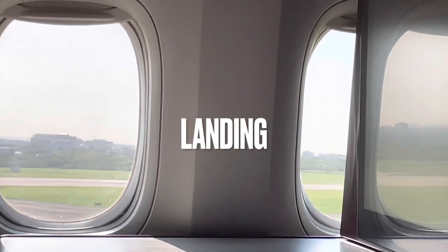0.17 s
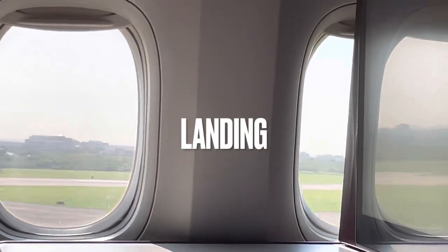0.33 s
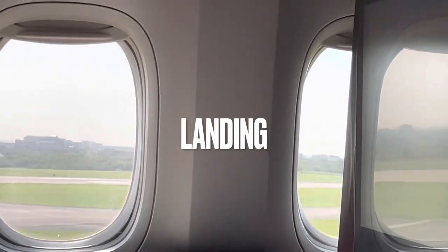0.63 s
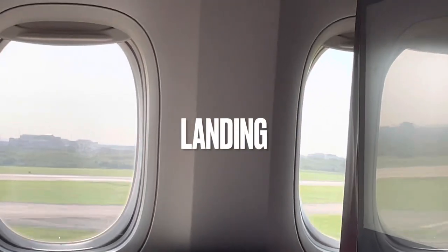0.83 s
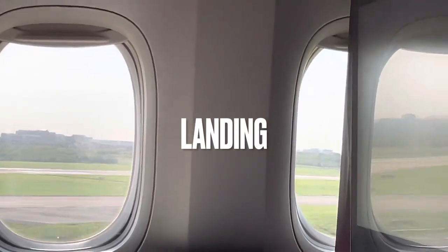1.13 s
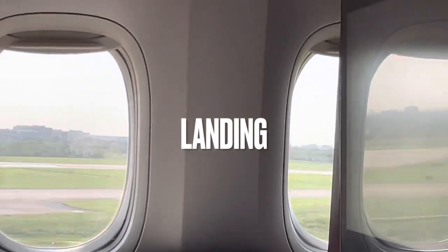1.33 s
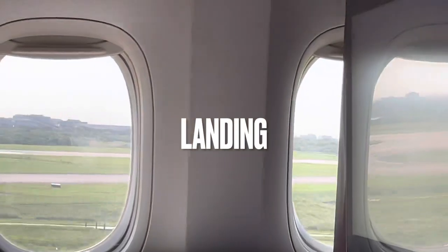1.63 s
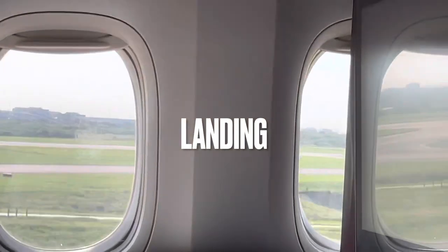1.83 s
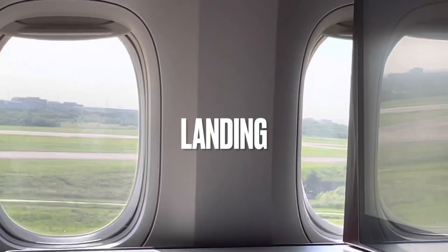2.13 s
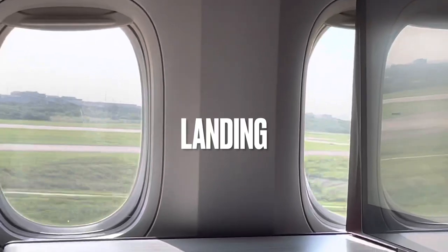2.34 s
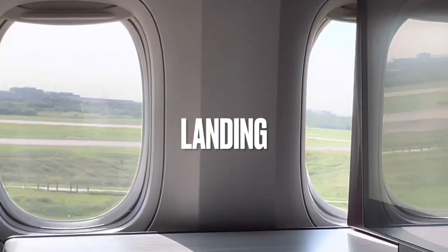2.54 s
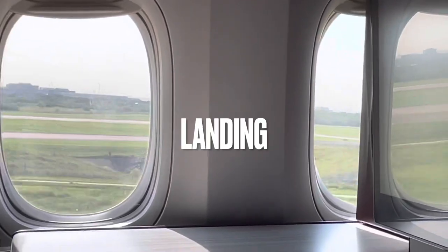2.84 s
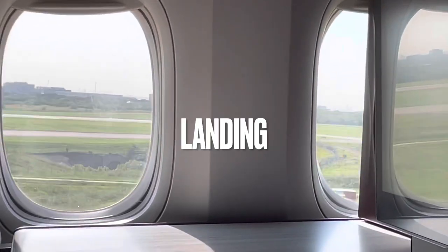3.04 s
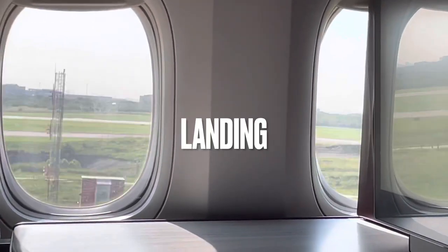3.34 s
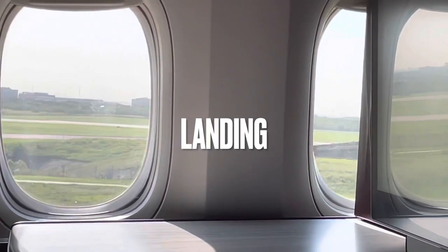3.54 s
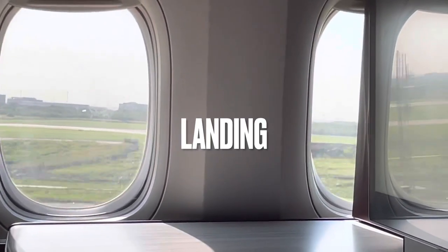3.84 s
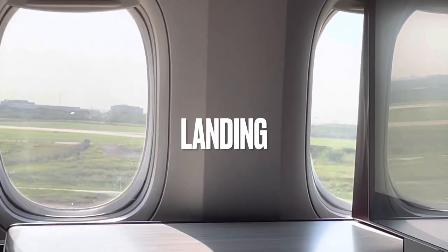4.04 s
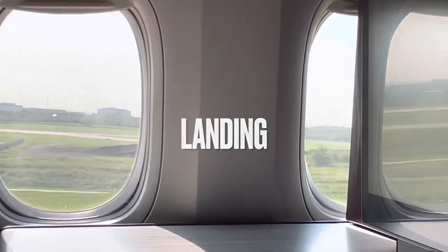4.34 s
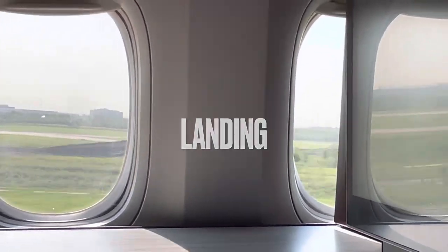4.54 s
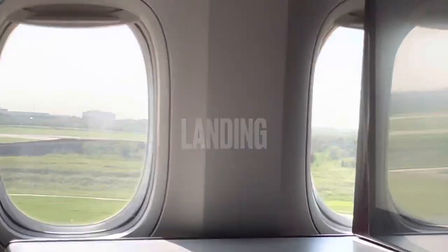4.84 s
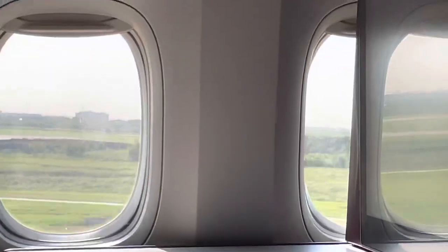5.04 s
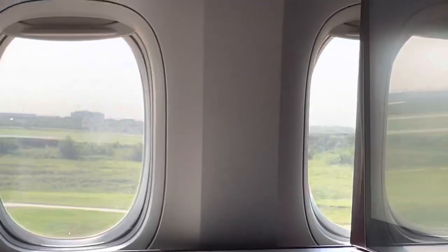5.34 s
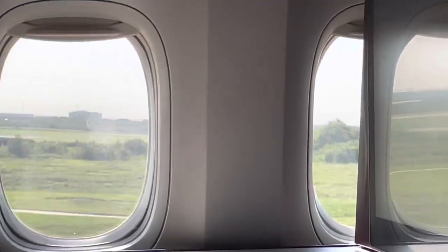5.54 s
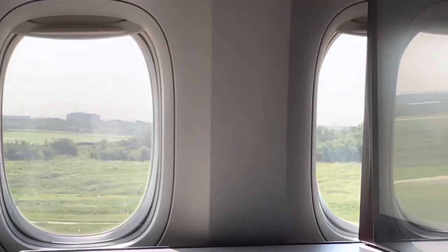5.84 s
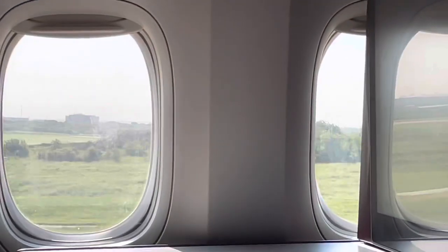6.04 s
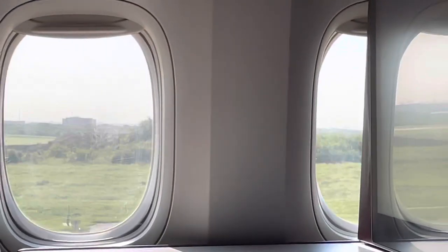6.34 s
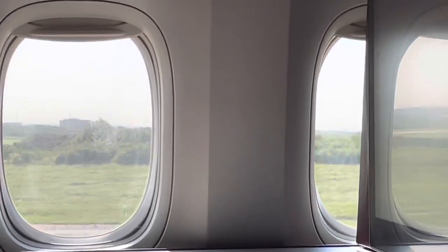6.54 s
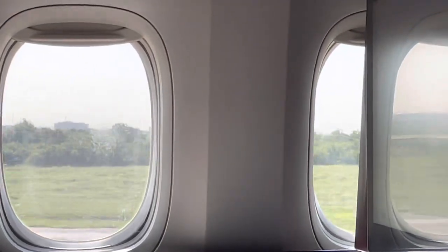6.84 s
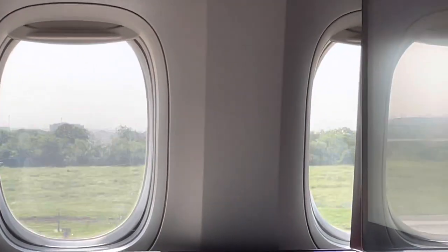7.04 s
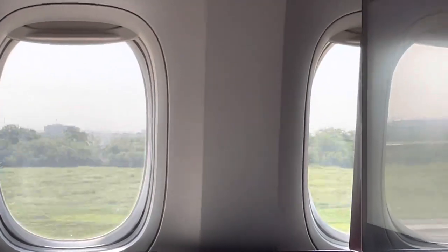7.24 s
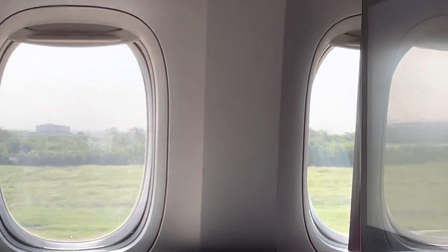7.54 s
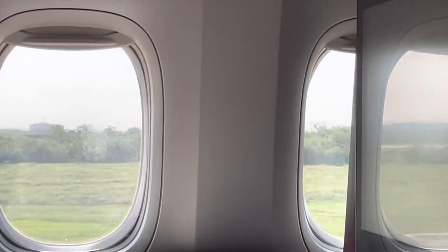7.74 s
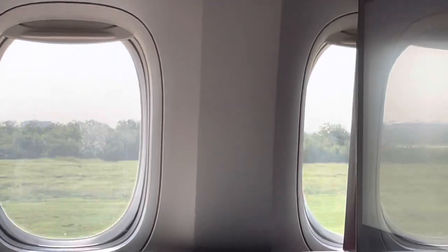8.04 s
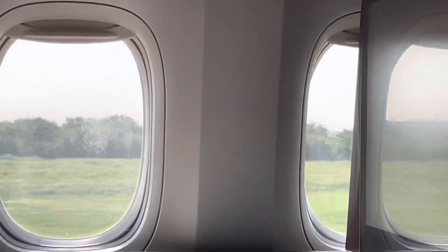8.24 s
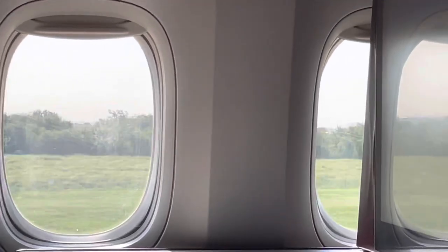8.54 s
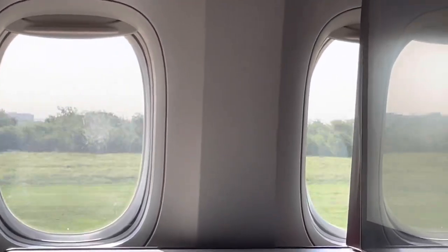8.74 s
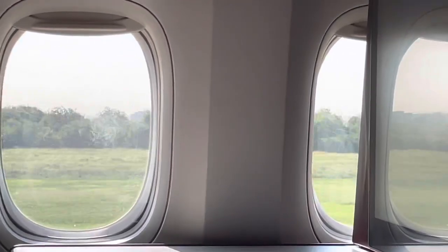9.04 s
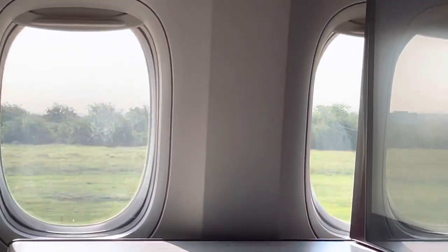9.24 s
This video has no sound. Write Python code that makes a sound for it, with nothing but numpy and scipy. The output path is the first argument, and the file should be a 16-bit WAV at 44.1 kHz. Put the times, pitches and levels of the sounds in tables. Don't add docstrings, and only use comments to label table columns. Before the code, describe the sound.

Inside an airliner cabin on landing, low rumble and vent hiss give way to a touchdown jolt, rattling panels, bangs and swelling reverse-thrust roar.

```python
import sys
import numpy as np
from scipy import signal
from scipy.fft import rfft, irfft, next_fast_len
from scipy.io import wavfile
from scipy.ndimage import uniform_filter1d, minimum_filter1d, map_coordinates

SR = 44100
rng = np.random.default_rng(int(sys.argv[2]) if len(sys.argv) > 2 else 0)


def output_pcm(signal):
    pcm = np.clip(np.atleast_2d(signal).T, -1, 1) * 32767
    wavfile.write(sys.argv[1], SR, np.round(pcm).astype(np.int16))


def gain_from_db(level_db):
    decades = np.asarray(level_db, float) / 20
    return 10 ** decades


N = 413658
TIME = np.arange(N) / SR
TOUCHDOWN_S, THRUST_FROM_S = 3.92, 5.6

# time in seconds, strength in dB.
SHAKING = [(3.7, -88), (3.95, -45.5), (4.14, -38), (4.47, -23.5), (4.66, -24), (4.95, -32.5), (5.6, -40),
           (5.9, -43), (6.2, -48), (6.46, -44), (6.55, -44.5), (7.87, -41), (8.02, -34.5), (8.31, -31.5),
           (8.9, -39), (9.17, -44), (9.26, -36), (9.38, -42.5)]
# frequency in Hz, density in dB per Hz.
PANEL_COLOUR = [(900, -14), (1250, 0), (1700, 0.5), (2150, -0.5), (2800, -5.5), (3800, -14.5), (5000, -58)]


def airframe():
    # frequency in Hz, density in dB per Hz.
    roar_colour = [(60, -13), (105, 0), (150, 0), (250, -2), (300, -6), (345, -4.5), (430, -8), (570, -17),
                   (800, -29.5)]
    air_roar_db, thrust_db, shake_roar_db = -25, -22, 5.5
    power, upper_share = drive()
    modes = []
    for centre_hz, width_hz in [(52, 32.2), (68, 16.4)]:
        def body(hz):
            return resonance(hz, centre_hz, width_hz) * resonance(hz, centre_hz, 4.06 * width_hz)
        modes.append(unit(filtered(rng.standard_normal((2, N)), body)))
    boom = np.sqrt(1 - upper_share) * modes[0] + np.sqrt(upper_share) * modes[1]
    swing = np.sqrt(np.abs(uniform_filter1d(boom ** 2, size=2500)) + 0.054)
    boom = np.sqrt(power) * unit(boom / swing ** 0.64)

    rolling = ramp(TOUCHDOWN_S, THRUST_FROM_S)
    roar_power = gain_from_db(2 * air_roar_db) + rolling * gain_from_db(2 * (thrust_db + thrust()))
    roar_power = roar_power + gain_from_db(2 * (curves(SHAKING)[0] + shake_roar_db))
    gusts = gain_from_db(0.44 * wobble(8))
    skin = coloured(patchy(0.43), roar_colour)
    skin_mode = filtered(skin, lambda hz: resonance(hz, 331.5, 27))
    skin = skin + (0.23 + rolling * 0.86) * skin_mode
    return boom + np.sqrt(roar_power) * gusts * skin


def drive():
    # centre in seconds, peak in dB, length in seconds, share of the upper mode 0-1.
    bumps = [(0.106, -21, 0.093, 1), (0.795, -23.5, 0.72, 0.04), (1.565, -17.5, 0.025, 0.85),
             (1.68, -18.5, 0.036, .6), (1.774, -20, 0.04, 0), (1.995, -19.5, 0.077, 0.7),
             (2.205, -21, 0.17, 0.82), (2.737, -16.5, 0.072, 0.74), (3.1, -23.5, 0.98, 0.83),
             (3.936, -13, 0.035, 0.33), (4.015, -10, 0.026, 0), (4.108, -13, 0.04, 0),
             (4.296, -10, 0.15, 0.33), (4.482, -10.5, 0.052, 0.8), (4.713, -14.5, 0.35, 0.15),
             (5.006, -15.5, 0.045, 0.06), (5.287, -19.5, 0.6, 0.63), (5.686, -10, 0.017, 0.3),
             (5.835, -18.5, 0.05, 1), (6.16, -18, 0.38, 1), (6.42, -11, 0.031, 0.7),
             (6.534, -16.5, 0.065, 0.7), (6.736, -15.5, 0.15, 0.47), (6.925, -15.5, 0.051, 0.5),
             (7.503, -16.5, 0.69, 0.4), (8.006, -10, 0.13, 1), (8.325, -10, 0.36, 1),
             (8.875, -16, 0.27, 0.63), (9.187, -7, 0.039, 0.9), (9.31, -14.5, 0.23, 0.94)]
    air_db, roll_db = -26, -25
    air_upper, roll_upper = 0.78, 0.24
    t = TIME[::64]
    down = ramp(TOUCHDOWN_S, TOUCHDOWN_S + .05)[::64]
    power = gain_from_db(2 * (air_db + down * (roll_db - air_db)))
    upper = power * (air_upper + down * (roll_upper - air_upper))
    for s, db, length, share in bumps:
        swell = gain_from_db(2 * db) / (1 + (2 * (t - s) / max(length, .02)) ** 4)
        power = power + swell
        upper = upper + swell * share
    upper_share = np.clip(upper / power, 0, 1)
    return [np.interp(TIME, t, v) for v in (power, upper_share)]


def thrust():
    full_s, rise_db = 8.47, 13.5
    return rise_db * (ramp(THRUST_FROM_S, full_s) - 1)


def rattle():
    # frequency in Hz, density in dB per Hz.
    dull_colour = [(250, -37), (480, -1), (800, -1.5), (1100, -6.5), (1500, -48)]
    # frequency in Hz, density in dB per Hz.
    bright_colour = [(3000, -2), (4200, -0.5), (6600, -6), (8200, -4), (12500, -23.5), (15700, -19)]
    panel_db, = curves(SHAKING)
    bright_db = -1 + 0.43 * (panel_db - panel_db.max()) + 0.22 * thrust()
    shared = 0.77 + 0.76 * contacts(99, spread_db=4.5, life=0.23)
    near = patchy(2.5)
    far = near[:, ::-1]

    def shake(x, spectrum):
        own = .4 * contacts(200, spread_db=3, life=0.066)
        return coloured(np.sqrt(shared + own) * x, spectrum)

    out = shake(near, PANEL_COLOUR)
    out = out + gain_from_db(3.5 + 1.8 * wobble(6.7)) * shake(far, dull_colour)
    out = out + gain_from_db(bright_db) * shake(far, bright_colour)
    return gain_from_db(panel_db - 1.57) * out


def clacks():
    # frequency in Hz, density in dB per Hz.
    snap_colour = [(2500, -20), (3200, 4.5), (4500, 6.5), (7000, 1), (10500, -12), (13000, -18),
                   (15700, -7)]
    # frequency in Hz, density in dB per Hz.
    knock_colour = [(250, -17), (480, 4.5), (700, -1.5), (950, -5), (1400, -20)]
    # frequency in Hz, density in dB per Hz.
    sheen_colour = [(7500, -31), (9000, 3), (13500, -9), (15700, -5)]
    # start in seconds, peak in dB, ring in Hz, crack in dB.
    thumps = [(4.33, -26, 900, -22), (7.76, -27, 1000, -25), (8.63, -23, 1000, -24),
              (8.866, -20, 1290, -29), (8.884, -21.5, 1110, -20), (8.902, -29, 1260, -7)]
    # start in seconds, peak in dB, ring in Hz, crack in dB.
    bins = [(4.0662, -24, 2030, -16), (4.4147, -9, 2200, -28), (4.396, -20, 2000, -19),
            (5.0125, -20, 1530, -12), (5.3976, -18, 2330, -12.5), (6.8134, -25.5, 2240, -10),
            (7.687, -23.5, 1800, -12), (8.7883, -29, 1440, -9)]
    # start in seconds, peak in dB, ring in Hz, crack in dB.
    trim = [(1.686, -24.5, 1880, -9.5), (2.5341, -26, 1950, -16), (4.2557, -22, 1480, -16),
            (4.3106, -9, 2080, -17), (4.4832, -7.5, 1870, -46), (4.5794, -15, 1890, -25),
            (4.6314, -18, 1800, -17), (4.9122, -16, 2010, -13), (5.4188, -18.5, 1980, -12),
            (5.7502, -20, 1500, -16), (5.916, -36, 2090, -18), (6.288, -27, 2300, -14),
            (6.2954, -24, 1510, -16.5), (7.755, -17.5, 2520, -11.5), (7.771, -17.5, 2300, -10.5),
            (8.2816, -21, 2240, -7), (8.5524, -26.5, 1350, -4.5), (9.0952, -25, 2100, -13)]
    # start in seconds, peak in dB, ring in Hz, crack in dB.
    latches = [(4.13, -17, 1680, -17), (4.8319, -17, 1940, -20), (5.472, -21.5, 2120, -16),
               (5.6384, -18, 2030, -16), (5.577, -20.5, 1890, -17), (6.354, -29, 2540, -23),
               (6.375, -35, 2500, -23), (6.4123, -22.5, 2080, -21), (6.427, -27.5, 1820, -29),
               (7.0145, -24.5, 2010, -13), (7.3262, -22, 1900, -30), (8.164, -30, 1430, -19),
               (9.2045, -21, 2700, -28)]
    # start in seconds, peak in dB, ring in Hz, crack in dB.
    slaps = [
        (8.0235, -15, 2890, -3),
        (8.034, -18, 1460, -24),
    ]
    # start in seconds, peak in dB, ring in Hz, crack in dB.
    slams = [
        (8.1148, -12, 1410, -16),
        (8.119, -14, 1050, -31),
    ]
    # start in seconds, peak in dB, ring in Hz, crack in dB.
    buckles = [
        (9.185, -22.5, 2960, 2.8),
    ]
    # start in seconds, peak in dB, ring in Hz, crack in dB.
    doors = [(4.333, -8.5, 716, -38), (4.416, -6.5, 794, -41), (4.497, -10, 804, -42),
             (4.57, -4.5, 760, -36), (4.625, -14, 560, -36), (4.74, -12, 800, -34), (4.865, -17, 650, -36),
             (5.398, -19.5, 900, -31.5)]
    # start in seconds, peak in dB, ring in Hz, crack in dB.
    loose = [(4.04, -26, 2000, -18), (4.181, -26, 2240, -14), (4.225, -24, 1700, -16),
             (4.585, -15, 1900, -18), (4.615, -15, 1600, -12), (4.665, -15, 2090, -14),
             (4.7, -17, 1800, -11), (4.73, -20, 1300, -15), (4.865, -19, 2200, -16), (4.94, -20, 1900, -17),
             (4.33, -12.5, 1720, -30), (4.4394, -7, 2810, -28), (4.5446, -8.5, 2030, -11.5),
             (4.497, -20, 1500, -25), (5.147, -25, 1080, -12), (5.5, -26, 1800, -17),
             (5.54, -23, 2120, -22), (5.717, -29, 2130, -22), (6.103, -32, 985, -20),
             (6.274, -30, 1730, -25), (6.366, -29, 3830, -25), (6.388, -21, 1900, -22),
             (6.72, -31, 2190, -14), (6.96, -26, 2000, -26), (7.088, -30, 1700, -26),
             (7.28, -24, 2180, -20), (7.352, -25, 1900, -23), (7.41, -28, 2150, -28),
             (7.465, -26, 2100, -12), (7.515, -27, 2200, -22), (7.588, -29, 1560, -13),
             (8.058, -21, 1350, -24), (8.08, -18, 1305, -12), (8.095, -25, 2200, -25),
             (8.866, -29, 1250, -27), (9.188, -23, 4830, -14), (9.192, -17, 3040, -13),
             (9.2, -25, 4300, -17), (9.198, -20, 2600, -18), (9.212, -21.5, 2590, -11),
             (9.203, -33, 2200, -25), (9.222, -27, 2040, -15), (9.27, -25, 2400, -10)]
    # start in seconds, peak in dB.
    ticks = [(4.1669, -46), (4.2672, -37), (4.2852, -29), (4.3271, -37), (4.3904, -35), (4.5436, -27),
             (4.7052, -31), (4.8768, -40), (5.1457, -52), (7.0239, -46), (8.0735, -36), (8.1663, -27.5),
             (7.71, -45), (7.7635, -43), (8.3205, -39), (8.4826, -34), (8.5634, -38), (8.8862, -45),
             (9.004, -43), (9.1856, -32)]
    # contacts, knock in dB, sheen over crack in dB, ring t60, knock t60 and attack in seconds.
    kinds = [(thumps, 16, -9, 0.089, 0.086, 0.0028), (bins, 6.8, -13, 0.16, 0.11, .001),
             (trim, 0.5, -26, 0.15, 0.16, .0018), (latches, -8, -20, 0.15, 0.24, .0008),
             (slaps, -21, -15, 0.086, .062, .0006), (slams, 0, 0, 0.067, 0.11, .0008),
             (buckles, -15, 2.5, 0.074, .16, .0004), (doors, -1, -9, 0.19, 0.11, 0.0022),
             (loose, -14, -14, 0.16, .1, 0.0016)]
    rise_cycles = 1.7
    out = np.zeros((2, N + SR))
    t = np.arange(SR // 6) / SR
    hz = np.fft.rfftfreq(len(t), 1 / SR)
    panel, knock, snap, sheen = (coloured(rng.standard_normal((2, N + len(t))), colour)
                                 for colour in (PANEL_COLOUR, knock_colour, snap_colour, sheen_colour))

    def fade(t60, attack):
        return (1 - np.exp(-t / attack)) * gain_from_db(-60 * t / t60)

    for rows, knock_db, sheen_db, t60, knock_t60, attack in kinds:
        for s, db, ring_hz, crack_db in rows:
            at = slice(round(s * SR), round(s * SR) + len(t))
            other_hz = rng.uniform(0.92, 1.77) * ring_hz
            modes = resonance(hz, ring_hz, 220) + 0.16 * resonance(hz, other_hz, 250)
            ring = unit(irfft(rfft(rng.standard_normal((2, len(t)))) * modes, len(t)))
            ring = ring + 0.89 * min(1, ring_hz / 1500, 2200 / ring_hz) ** 3 * panel[:, at]
            ring = ring + 1.3 * np.sin(2 * np.pi * ring_hz * t) * gain_from_db(-60 * t / 0.046)
            ring = ring * fade(t60, attack) * (1 - np.exp(-t * ring_hz / rise_cycles))
            brief = fade(0.035, attack)
            crack = snap[:, at] * (fade(0.79 * t60, attack) + 0.7 * brief)
            crack = crack + gain_from_db(sheen_db) * sheen[:, at] * brief
            dull = gain_from_db(knock_db) * knock[:, at] * fade(knock_t60, attack)
            out[:, at] += gain_from_db(db - 11.5) * (ring + dull + gain_from_db(crack_db + 6.5) * crack)
    for s, db in ticks:
        at = slice(round(s * SR), round(s * SR) + len(t))
        out[:, at] += gain_from_db(db - 3) * sheen[:, at] * fade(.035, .0008)
    return out[:, :N]


def slam():
    # mode in Hz, level in dB, t60 in seconds.
    panel_modes = [(495, -6.5, 0.039), (860, -18, .05), (1020, -13, 0.049), (1217, -13.5, 0.038),
                   (1480, -16, 0.065)]
    # mode in Hz, level in dB, t60 in seconds.
    crack_modes = [(2080, 2, 0.0084), (2450, -9, .01), (3400, -20, .008), (1500, -12, .012)]
    # mode in Hz, level in dB, t60 in seconds.
    low_modes = [(190, -19.5, .3), (225, -20.5, .25)]
    # mode in Hz, level in dB, t60 in seconds.
    thump_modes = [(560, -15.5, 0.066), (884, -18, .06), (1250, -26, .04), (1600, -30, .03)]
    # mode in Hz, level in dB, t60 in seconds.
    slap_modes = [(1450, -14, .016), (2150, -22, .04), (2760, -16, 0.021), (3230, -18, .02),
                  (5170, -20, .015)]
    # start in seconds, level in dB, modes struck.
    strikes = [(8.1145, 2, panel_modes), (8.1163, 2.5, crack_modes), (8.1285, -3, panel_modes[:1]),
               (7.9, -6, panel_modes[:1]), (8.1215, -7, panel_modes[1:4]), (8.06, -2, low_modes),
               (8.14, 0.5, low_modes), (8.22, 0, low_modes), (8.129, -13, panel_modes[2:]),
               (8.0232, 1.5, slap_modes), (8.851, 0, thump_modes[:1]), (8.871, -1, thump_modes),
               (8.884, -1, thump_modes[:1]), (8.901, -8, thump_modes[:2])]
    out = np.zeros(N + SR)
    t = np.arange(SR // 5) / SR
    for s, db, modes in strikes:
        ring = sum(gain_from_db(level_db - 60 * t / t60) * np.sin(2 * np.pi * hz * t) for hz, level_db, t60 in modes)
        out[round(s * SR):][:len(t)] += gain_from_db(db) * (1 - np.exp(-t / 0.0008)) * ring
    return out[:N]


def squeaks():
    # start in seconds, peak in dB, pitch in Hz, octave in dB, length in seconds.
    rubs = [(0.163, -33.5, 2015, -30, 0.042), (2.11, -38, 2060, -30, 0.037), (2.415, -39, 2020, -30, 0.033),
            (3.01, -41, 2050, -30, .04), (3.255, -42, 1950, -30, 0.026), (3.449, -39, 2050, -32, 0.033),
            (4.756, -20, 2150, -23, 0.018), (5.657, -30, 2120, -24, .025), (8.841, -26, 1950, -31, .006),
            (5.473, -25.5, 2140, -21, 0.025), (5.627, -19, 2160, -23, 0.013), (5.858, -29, 2100, -26, 0.02),
            (5.864, -31, 2290, -13.5, 0.032), (6.463, -26, 2270, -16.5, 0.033),
            (6.815, -38.5, 2295, -1.5, 0.017), (6.83, -31, 2340, -18, 0.014), (8.212, -28, 2130, -25, 0.02)]
    # start in seconds, peak in dB, pitch in Hz.
    chirps = [
        (0.7557, -41, 11400),
        (0.8884, -41, 11300),
        (1.9275, -51.5, 11600),
        (2.6963, -43, 11300),
    ]
    out = np.zeros(N + SR)
    for s, db, hz, octave_db, length in rubs:
        t = np.arange(int((3 * length + .05) * SR)) / SR
        pitch = hz * (1 + .08 * (t - length / 2)) + 360 * rng.standard_normal(len(t))
        phase = 2 * np.pi * np.cumsum(pitch) / SR
        body = 1 / (1 + (t / length) ** 6) + 0.22 * np.exp(-t / .03)
        flutter = 1 + .3 * np.sin(2 * np.pi * 85 * t + 6 * rng.random())
        shape = (1 - np.exp(-t / 0.0015)) * body * flutter
        tone = np.sin(phase) + gain_from_db(octave_db + 7.0) * np.sin(2 * phase)
        out[round(s * SR):][:len(t)] += gain_from_db(db - 3.5) * shape * tone
    t = np.arange(SR // 20) / SR
    swell = np.sin(np.pi * np.clip(t / 0.031, 0, 1))
    for s, db, hz in chirps:
        pitch = hz * (1.04 - 1.8 * t) + 1500 * rng.standard_normal(len(t))
        phase = 2 * np.pi * np.cumsum(pitch) / SR
        out[round(s * SR):][:len(t)] += gain_from_db(db - 8.5) * swell * np.sin(phase)
    return out[:N]


def vents():
    # frequency in Hz, density in dB per Hz.
    vent_colour = [(300, -3.5), (520, -4.5), (800, -0.5), (1500, -10), (1900, -9), (2140, -6), (2450, -10),
                   (3300, -13), (6000, -21), (8200, -23.5), (12500, -38.5), (15700, -34)]
    # time in seconds, level in dB.
    air_whine = [(0, -66), (1.7, -59), (2.05, -51), (3, -51), (4, -50), (4.4, -62), (5.3, -75)]
    # time in seconds, level in dB.
    roll_whine = [(3.9, -75), (4.3, -60), (5.4, -57), (5.55, -47), (5.66, -47), (5.72, -55), (6.4, -52),
                  (9.38, -66)]
    # pitch in Hz, wavering in Hz, level in dB, clearest at and for in seconds.
    air_lines = [(2785, 12, 0, 3.55, 1.1), (3205, 27, 2.5, 3.2, 3.2), (3628, 18, -2, 3.05, 1.4)]
    # pitch in Hz, wavering in Hz, level in dB, clearest at and for in seconds.
    roll_lines = [(2945, 30, 0, 6, 9)]
    out = gain_from_db(-37.5 + 0.065 * wobble(4.6)) * coloured(patchy(1.26), vent_colour)
    spool = 1 - .011 * np.clip(TIME - 3, -1.5, 1.5)
    for rows, lines in [(air_whine, air_lines), (roll_whine, roll_lines)]:
        whine_db, = curves(rows)
        for hz, width_hz, level_db, at, length in lines:
            pitch = hz * spool + width_hz * (.5 * wobble(4) + 1.1 * wobble(60))
            phase = 2 * np.pi * np.cumsum(pitch) / SR
            presence = 1 / (1 + (2 * (TIME - at) / length) ** 4)
            out = out + gain_from_db(whine_db + level_db + 1.8 * wobble(9)) * np.sin(phase) * presence
    return out


def contacts(rate, spread_db, life):
    strength_db = spread_db * np.minimum(rng.exponential(size=N), 1.7)
    taps = (rng.random(N) < rate / SR) * gain_from_db(strength_db)
    t = np.arange(SR // 8) / SR
    decay = (1 - np.exp(-t / 0.0015)) * gain_from_db(-120 * t / life)
    burst = np.abs(signal.fftconvolve(taps ** 2, decay)[:N])
    return burst / np.mean(burst)


def patchy(patchy_db):
    z = signal.stft(rng.standard_normal((2, N)), nperseg=512)[2]
    field = uniform_filter1d(rng.standard_normal(z.shape[1:]), size=6, axis=0)
    field = uniform_filter1d(field, size=10, axis=1)
    return signal.istft(z * gain_from_db(patchy_db * unit(field)), nperseg=512)[1][:, :N]


def resonance(hz, centre_hz, width_hz):
    return 1j * hz * width_hz / (centre_hz ** 2 - hz ** 2 + 1j * hz * width_hz)


def filtered(x, response):
    m = next_fast_len(x.shape[-1] + 8192)
    return irfft(rfft(x, m) * response(np.fft.rfftfreq(m, 1 / SR)), m)[..., :x.shape[-1]]


def coloured(x, spectrum):
    closed = [(spectrum[0][0] / 2, -120)] + list(spectrum) + [(spectrum[-1][0] * 2, -120)]
    return unit(filtered(x, lambda hz: gain_from_db(along(closed, hz))))


def unit(x):
    return x / np.sqrt(np.mean(x ** 2) + 1e-20)


def along(points, hz):
    f, v = np.transpose(points)
    return np.interp(np.log(hz + 1), np.log(f + 1), v)


def curves(rows):
    s, *cols = np.transpose(rows)
    return [np.interp(TIME, s, c) for c in cols]


def ramp(from_s, to_s):
    return np.clip((TIME - from_s) / (to_s - from_s), 0, 1)


def wobble(rate):
    coarse = np.arange(0, N + 64, 64)
    knots = rng.standard_normal(int(N * rate / SR) + 4)
    return np.interp(np.arange(N), coarse, map_coordinates(knots, [coarse * rate / SR]))


def scene():
    return airframe() + rattle() + clacks() + slam() + squeaks() + vents()


def joint(mid, side):
    # frequency in Hz, margin in dB.
    margin_rows = [(6000, 12), (6900, 7), (7900, 8), (8300, 11), (9000, 10), (9700, 8), (12000, 5),
                   (13300, 4), (13900, 8), (14500, 12)]
    wander_db, attack_db = 4, 13.5
    both = np.array([mid, side])
    hz, _, z = signal.stft(both, SR, nperseg=2048)
    bands = (np.abs(z[:, :1024]) ** 2).reshape(2, 256, 4, -1).sum(axis=2)
    bands = uniform_filter1d(bands, size=2, axis=1)
    band_hz = hz[:1024:4, None]
    wander = uniform_filter1d(rng.standard_normal((64, bands.shape[2])), size=3, axis=1)
    wander = unit(wander).repeat(4, axis=0)
    margin = along(margin_rows, band_hz) + wander_db * wander * (band_hz > 7000)
    strong = bands > bands[::-1] * gain_from_db(-2 * margin)
    z[:, :1024] *= np.repeat(strong, 4, axis=1) | (hz[:1024, None] < 1900)
    pruned = signal.istft(z, SR, nperseg=2048)[1][:, :N]
    treble = (filtered(both, lambda f: f > 9000) ** 2).sum(axis=0)
    before = np.roll(np.abs(uniform_filter1d(treble, size=900)), 650)
    jump = uniform_filter1d(treble, size=300) > gain_from_db(2 * attack_db) * before
    return pruned + uniform_filter1d(1. * jump, size=120) * (both - pruned)


def roll_off(x):
    return signal.sosfilt(signal.butter(12, 15850, fs=SR, output="sos"), x)


def record(dry):
    # frequency in Hz, difference over sum in dB.
    ports = [(40, -25.5), (100, -11.5), (300, -8.5), (1100, -5), (1850, -5.5),
             (2300, -13), (3000, -26), (5500, -26), (6250, -13), (6800, -4), (7400, 3), (7800, 13),
                    (8300, 21), (8900, 13), (9500, 1), (10450, -12), (11700, -24), (12900, -12), (13350, 0),
                    (13800, 11), (14700, 26)]
    # frequency in Hz, left over right in dB.
    balance = [(60, -1), (140, .5), (260, 4), (480, 3), (730, .5), (1700, 2.2), (2300, 1), (2550, 0),
               (3900, 0)]
    top_hz = 15850

    def turn(hz):
        return np.arctan(gain_from_db(along(ports, hz)))

    def to_side(hz):
        sign = np.where((hz > 8300) & (hz < 11700), -1, 1)
        lag = np.where(hz > 5000, 0.99 * sign, 0)
        return np.sin(turn(hz)) * (hz < top_hz) * np.array([1j * lag, np.sqrt(1 - lag ** 2)])

    mid = filtered(dry[0], lambda hz: np.cos(turn(hz)) * (hz < top_hz))
    side = filtered(dry, to_side).sum(axis=0)
    needed = np.minimum(1, .87 / (np.abs(mid) + np.abs(side) + 1e-9))
    gain = uniform_filter1d(minimum_filter1d(needed, size=500), size=500)
    mid, side = joint(gain * mid, gain * side)
    halves = np.array([[.5], [-.5]])
    pair = filtered(np.array([mid + side, mid - side]), lambda hz: gain_from_db(along(balance, hz) * halves))
    return roll_off(pair)


dry = scene()
out = record(dry)
output_pcm(out)
```